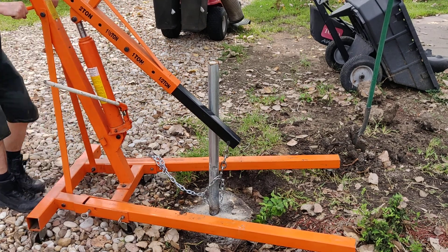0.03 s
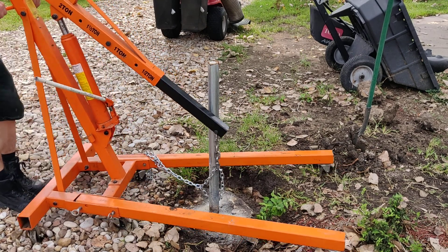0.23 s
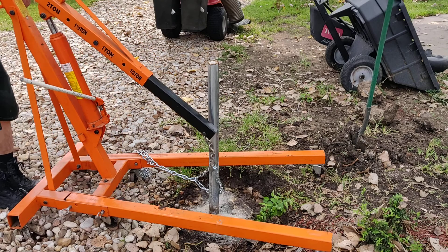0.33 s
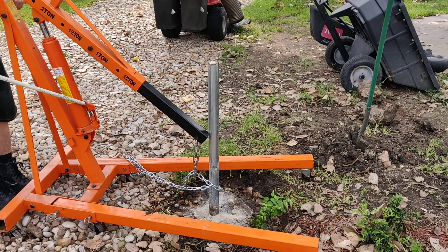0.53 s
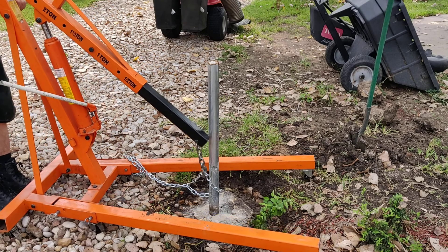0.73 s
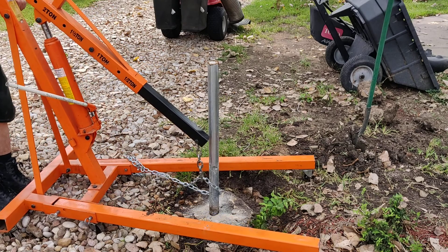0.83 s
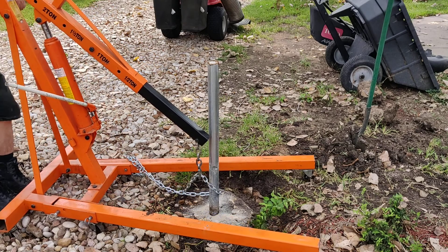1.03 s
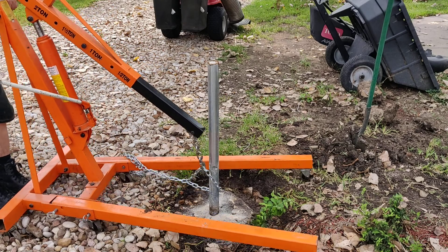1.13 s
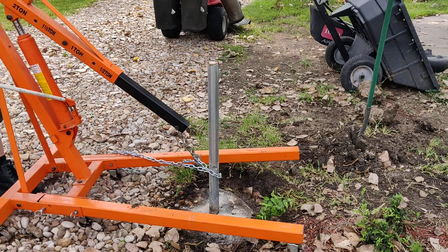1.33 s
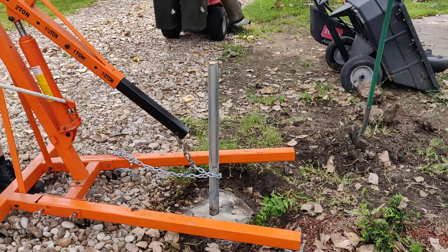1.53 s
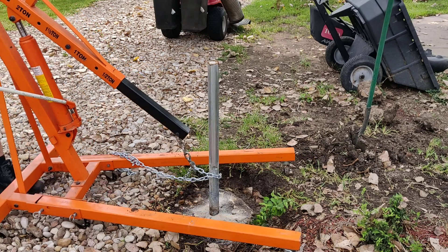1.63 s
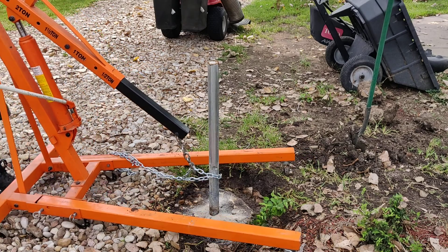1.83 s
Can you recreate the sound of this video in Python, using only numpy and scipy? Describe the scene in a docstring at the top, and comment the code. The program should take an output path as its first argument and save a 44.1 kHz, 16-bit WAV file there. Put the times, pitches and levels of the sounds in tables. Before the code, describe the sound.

Small hoist wheels crunch and jolt over gravel in two pushes, with light chain clinks.

```python
"""Engine hoist on gravel.

A steel hoist is shoved twice over a yard. Its small wheels grind through the stones and jolt over
them, pebbles snap aside and the hollow frame rings. Its chain knocks on a steel post and clinks.
A low outdoor rumble lies below; the two microphone ports colour the treble differently."""
import sys
import numpy as np
from scipy import signal
from scipy.fft import rfft, irfft, next_fast_len
from scipy.io import wavfile
from scipy.ndimage import uniform_filter1d, minimum_filter1d

SR = 44100
rng = np.random.default_rng(int(sys.argv[2]) if len(sys.argv) > 2 else 0)


def bounce(signal):
    """Save signal as a 16-bit WAV file at the path given by the first command-line argument."""
    frames = np.transpose(np.atleast_2d(signal))
    limited = np.clip(frames, -1, 1)
    pcm = np.round(limited * 32767).astype(np.int16)
    wavfile.write(sys.argv[1], SR, pcm)


N = 83790
TIME_S = np.arange(N) / SR

# noise spectra: freq_hz, relative_density_db
RUMBLE_SPECTRUM = [(25, 1.5), (40, -4), (57, -6), (80, -4), (130, -4), (220, -12), (450, -18),
                   (1100, -18.5), (2500, -39), (6000, -33), (15000, -34)]
CRUNCH_SPECTRUM = [(500, -19), (1200, -14.5), (2000, -2.5), (2500, -4), (3050, -5), (3800, 4), (5500, 1.5),
                   (7000, 2.5), (9000, -7), (15000, -10)]
GRIND_SPECTRUM = [(100, -16), (200, -4.5), (300, -6.5), (420, 0), (650, 2.5), (1300, 3), (1900, -3.5),
                  (2800, -1.5), (5000, -21)]
PEBBLE_SPECTRUM = [(1500, -17), (3000, -11.5), (4200, 2.5), (6300, 5), (8500, -6), (15000, -7.5)]
# level curves: time_s, level_db
DRONE_LEVELS = [(0, -38), (.4, -49.5), (.75, -47.5), (.95, -49.5), (1.1, -34.5), (1.25, -53), (1.42, -40.5),
                (1.5, -37), (1.62, -47), (1.9, -38)]
HISS_LEVELS = [(.14, -62), (.2, -38), (.28, -26), (.32, -14.5), (.39, -30), (.46, -18), (.56, -32),
               (.68, -34), (.74, -43), (.78, -31.5), (.88, -56), (1.14, -53), (1.22, -24), (1.37, -34),
               (1.45, -14.5), (1.54, -29), (1.59, -17.5), (1.66, -27), (1.76, -63)]
# wheels in gravel, per shove: time_s, crunch_db, grind_db
SHOVE_1 = [(0, -78, -51.5), (.06, -62, -57.5), (.11, -49, -51.5), (.168, -40.5, -45.5), (.2, -33, -36.5),
           (0.238, -37, -25), (0.258, -16.5, -30.5), (0.291, -20, -28.5), (.33, -16.5, -25.5),
           (0.388, -22, -32.5), (.48, -20, -25), (0.521, -13, -21.5), (0.571, -22.5, -29),
           (0.606, -20.5, -37.5), (0.629, -32.5, -34.5), (.71, -38, -51), (.87, -53.5, -57)]
SHOVE_2 = [(1.03, -62, -52.5), (1.09, -42.5, -49), (1.153, -47, -42), (1.183, -26.5, -18.5),
           (1.227, -21.5, -26), (1.275, -22.5, -33.5), (1.301, -20.5, -30.5), (1.43, -29.5, -34.5),
           (1.482, -22, -32.5), (1.521, -32, -36), (1.585, -34.5, -43.5), (1.616, -35, -39.5),
           (1.7, -48.5, -52.5), (1.75, -58.5, -49.5), (1.809, -44, -49), (1.9, -57, -63)]
# pebbles snapping aside: start_s, level_db
PEBBLE_SNAPS = [(0.07, -27), (0.0896, -24.5), (0.129, -26.5), (0.1792, -19.5), (0.446, -17), (0.459, -17),
                (0.4797, -15), (0.487, -17.5), (0.565, -17), (0.687, -29), (0.7137, -21.5), (0.785, -35),
                (0.8126, -34.5), (1.1345, -23.5), (1.18, -28), (1.2955, -15), (1.346, -10.5), (1.602, -23),
                (1.615, -29)]
# wheel jolts: start_s, crunch_db, thud_db, t60_s
WHEEL_JOLTS = [(0.1765, -24, -34, 0.16), (0.244, -6, -15.5, 0.12), (0.3015, -13, -18.5, 0.24),
               (.327, -8, -31, 0.12), (0.502, -12.5, -39, 0.082), (0.59, -20, -18, 0.029),
               (1.17, -22, -21, 0.13), (1.188, -2, -39, 0.051), (1.2022, -7.5, -48, 0.15)]
# chain contacts: start_s, level_db, tilt_db_per_octave
POST_KNOCKS = [(.9058, -30.5, -1), (1.2055, -25, 11.5)]
LINK_CLINKS = [(.999, -42, -4.5), (1.7625, -36, 2), (1.797, -42.5, 11.5)]
# steel modes: pitch_hz, gain_db, t60_s
FRAME_MODES = [(305.3, -8.5, 0.098), (857, -14, 1), (1212, -12, 0.66), (1665, -5.5, 0.071), (1800, -10, 1),
               (1855, -12.5, 0.11), (3567, -4, 0.18), (3783, -2.5, 0.042), (4480, -7, 0.15),
               (4890, -2, 0.051), (5470, -9.5, 0.033), (5670, -11, 0.072)]
POST_MODES = [(1808, 0, 0.69), (1960, -14, 0.22), (3876, 2, 0.15), (4980, -1, 0.16), (4970, -4.5, 0.38),
              (5728, -17, 0.08), (6190, -15, 0.087), (7500, -25, .14), (8260, 2, 0.1), (8600, -9, 0.15),
              (10020, -12, 0.18)]
LINK_MODES = [(1217, -3.5, .07), (1710, 5, 0.07), (1966, 9.5, 0.031), (2663, 2, 0.093), (3520, 11, 0.027),
              (4032, 6.5, 0.053), (6440, -31, .12), (7100, -35, 0.13)]
# left-right likeness: freq_hz, coherence
STEREO_COHERENCE = [(60, 0.98), (250, 0.97), (600, 0.83), (1200, 0.37), (2500, 0.34), (6000, 0.19),
                    (14000, .35)]
# microphone port responses: freq_hz, gain_db
LEFT_RESPONSE = [(100, -1), (1200, 0.5), (2500, 2.5), (3050, 2), (3600, 0), (4500, 0.5), (5500, 4),
                 (6300, 9.5), (7100, 0.5), (8100, -7.5), (8900, -31), (10300, -36), (12500, -27),
                 (14300, -26.5), (16000, -22)]
RIGHT_RESPONSE = [(100, -1.5), (1200, -2), (2500, 1), (3050, 2.5), (3600, -2.5), (5500, -2), (6300, -3.5),
                  (7300, -3.5), (8400, 1), (9400, -4), (10500, -24), (12800, -23), (14000, -15),
                  (16000, -17.5)]


def from_db(db):
    """Decibels to gain."""
    return 10 ** (np.asarray(db) / 20)


def unit_rms(x):
    """Scale to rms 1."""
    return x / np.sqrt(np.mean(x ** 2) + 1e-20)


def at_hz(points, hz):
    """Interpolate over log frequency."""
    freqs_hz, values = np.transpose(points)
    return np.interp(np.log(np.maximum(hz, 1)), np.log(freqs_hz), values)


def drift(rate_hz):
    """Smooth random wander, rms 1."""
    hop, warmup = 40, 2000
    pole = np.exp(-2 * np.pi * rate_hz * hop / SR)
    white = rng.standard_normal(N // hop + warmup + 2)
    slow = signal.lfilter([1], [1, -2 * pole, pole * pole], white)[warmup:]
    return np.interp(np.arange(N) / hop, np.arange(len(slow)), unit_rms(slow))


def delayed(x, delay_s):
    """Delay by whole samples."""
    return np.r_[np.zeros(round(delay_s * SR)), x][:N]


def clicks(starts_s, levels_db):
    """One impulse per event."""
    out = np.zeros(N)
    samples = np.round(np.array(starts_s) * SR).astype(int)
    np.add.at(out, np.clip(samples, 0, N - 1), from_db(levels_db))
    return out


def decay_power(hits, t60_s):
    """Power envelope decaying from each hit."""
    return signal.lfilter([1], [1, -10 ** (-6 / (t60_s * SR))], hits ** 2 + 1e-18)


def ring(drive, hz, t60_s):
    """One mode: a unit click starts a decaying unit sine."""
    pole = np.exp(-np.log(1000) / (t60_s * SR))
    step_rad = 2 * np.pi * hz / SR
    feedback = [1, -2 * pole * np.cos(step_rad), pole * pole]
    return signal.lfilter([0, np.sin(step_rad)], feedback, drive + 1e-18)


def band_noise(power, spectrum, colour_db=3.5, stones_per_s=97):
    """Stereo noise in third octaves; band gains wander by colour_db, as each stone favours others."""
    edges_hz = 22 * 2 ** (np.arange(30) / 3)
    centres_hz = np.sqrt(edges_hz[1:] * edges_hz[:-1])
    gains = from_db(at_hz(spectrum, centres_hz)) * (centres_hz > spectrum[0][0] / 2)
    gains /= np.sqrt(np.sum(gains ** 2 * np.diff(edges_hz)) * 2 / SR)
    white = rng.standard_normal((2, 2, N)) * np.sqrt(power)
    out = np.zeros((2, N))
    for k in np.flatnonzero(gains):
        band = signal.butter(2, edges_hz[k:k + 2], "band", fs=SR, output="sos")
        wander = unit_rms(from_db(colour_db * drift(stones_per_s)))
        mid, side = signal.sosfilt(band, white[k % 2] * wander)  # adjacent bands independent
        coherence = at_hz(STEREO_COHERENCE, centres_hz[k])
        mid *= np.sqrt((1 + coherence) / 2)
        side *= np.sqrt((1 - coherence) / 2)
        out += gains[k] * np.array([mid + side, mid - side])
    return out


def background(rumble_db=-40, drone_hz=56, waver_rad=0.99):
    """Outdoor rumble; a wavering low drone swells and sinks."""
    drone = np.sqrt(2) * np.sin(2 * np.pi * drone_hz * TIME_S + waver_rad * drift(4.5))
    drone_db = np.interp(TIME_S, *np.transpose(DRONE_LEVELS))
    rumble = band_noise(np.ones(N), RUMBLE_SPECTRUM, colour_db=0)
    return from_db(rumble_db) * rumble + from_db(drone_db) * drone


def stone_cracks(crunch_db, ref_per_s=1700, ref_db=-20, spread_db=0.5):
    """Power of random cracks, mean near 1; denser under a harder shove."""
    rate_per_s = ref_per_s * from_db(0.55 * (crunch_db - ref_db))
    sizes = from_db(-spread_db * np.minimum(rng.exponential(1, N), 4))
    hits = sizes * (rng.random(N) < rate_per_s / SR)
    power = decay_power(hits, t60_s=0.0097)
    power += 0.15 * power.mean()
    return power / uniform_filter1d(power, size=1300)


def gravel():
    """Wheels crush stones: bright crunch, low grinding that shakes the frame, jolts."""
    times_s, crunch_db, grind_db = np.transpose(SHOVE_1 + SHOVE_2)
    crunch_db = np.interp(TIME_S, times_s, crunch_db)
    grind_db = np.interp(TIME_S, times_s, grind_db)
    cracks = stone_cracks(crunch_db)
    crunch_power = cracks * from_db(crunch_db) ** 2
    grind_power = cracks * from_db(grind_db) ** 2
    ringing = frame(grind_power)
    for start_s, jolt_db, thud_db, t60_s in WHEEL_JOLTS:
        crunch_power += jolt(start_s, jolt_db, t60_s) * np.sqrt(cracks)
        grind_power += jolt(start_s, thud_db, t60_s) * np.sqrt(cracks)
    return band_noise(crunch_power, CRUNCH_SPECTRUM) + band_noise(grind_power, GRIND_SPECTRUM) + ringing


def frame(power, gain_db=-5):
    """Stones rattling against the wheels ring the steel frame."""
    out = np.zeros((2, N))
    for hz, mode_db, t60_s in FRAME_MODES:
        coherence = at_hz(STEREO_COHERENCE, hz)
        common = np.sqrt(coherence) * rng.standard_normal(N)
        separate = np.sqrt(1 - coherence) * rng.standard_normal((2, N))
        rattle = np.sqrt(power) * (common + separate)
        out += from_db(mode_db) * unit_rms(ring(rattle, hz, t60_s))
    return out * np.sqrt(power.mean()) * from_db(gain_db)


def pebbles():
    """Single pebbles snap out from under a wheel."""
    power = decay_power(clicks(*np.transpose(PEBBLE_SNAPS)), t60_s=0.018)
    return band_noise(power, PEBBLE_SPECTRUM, colour_db=3)


def top_hiss(band_hz=(13400, 15000), grain_db=1, left_db=-1.5):
    """Thin, grainy hiss above the crunch, slightly right."""
    level_db = np.interp(TIME_S, *np.transpose(HISS_LEVELS)) + grain_db * drift(60)
    band = signal.butter(5, band_hz, "band", fs=SR, output="sos")
    hiss = unit_rms(signal.sosfilt(band, rng.standard_normal((2, N))))
    return hiss * from_db(level_db) * from_db([[left_db], [0]])


def jolt(start_s, level_db, t60_s, attack_s=0.00075):
    """Power of a wheel dropping off a stone: those below give way, then settle."""
    attack = 1 - np.exp(-np.maximum(TIME_S - start_s, 0) / attack_s)
    return attack * decay_power(clicks([start_s], level_db), t60_s)


def chain_strikes(contacts, modes, rattle_db, rattle_t60_s):
    """Steel on steel: a short rattle and ringing modes, each contact with its own brightness."""
    starts_s, levels_db, tilts_db_per_octave = np.transpose(contacts)
    rattle_power = decay_power(clicks(starts_s, levels_db + rattle_db), rattle_t60_s)
    out = band_noise(rattle_power, CRUNCH_SPECTRUM)
    for hz, mode_db, t60_s in modes:
        tilt_db = tilts_db_per_octave * np.log2(hz / 4000)
        tone = ring(clicks(starts_s, levels_db + mode_db + tilt_db), hz, t60_s)
        lag_cycles = rng.uniform(0, 0.067)
        out += np.array([tone, delayed(tone, lag_cycles / hz)])
    return out


def yard_scatter(x, gain_db=-6.5, t60_s=0.068, gap_s=0.004):
    """Faint reflections off the ground and nearby objects."""
    age_s = TIME_S[:SR // 2]
    envelope = np.exp(-np.log(1000) * age_s / t60_s) * (age_s > gap_s)
    tail = rng.standard_normal((2, len(age_s))) * envelope
    tail /= np.sqrt(np.sum(tail ** 2) / 2)
    return from_db(gain_db) * signal.fftconvolve(x, tail, axes=1)[:, :N]


def mic_port(x, response):
    """Minimum-phase colour of one microphone port."""
    size = 2 * next_fast_len(N)
    gains = from_db(at_hz(response, np.fft.rfftfreq(size, 1 / SR)))
    cepstrum = irfft(np.log(gains))
    causal_fold = np.r_[1, np.full(size // 2 - 1, 2), 1, np.zeros(size // 2 - 1)]
    return irfft(rfft(x, size) * np.exp(rfft(cepstrum * causal_fold)))[:N]


def limiter(x, ceiling_db=-2, hold_s=0.003):
    """Gain ducks briefly around peaks."""
    size, ceiling = int(hold_s * SR), from_db(ceiling_db)
    gain = ceiling / np.maximum(np.abs(x), ceiling)
    return x * uniform_filter1d(minimum_filter1d(gain, size), size)


def scene():
    """Hoist and chain slightly left, in open air."""
    knocks = chain_strikes(POST_KNOCKS, POST_MODES, rattle_db=1.5, rattle_t60_s=0.22)
    clinks = chain_strikes(LINK_CLINKS, LINK_MODES, rattle_db=0.5, rattle_t60_s=0.071)
    left, right = gravel() + pebbles() + top_hiss() + knocks + clinks
    hoist = np.array([left, delayed(right, delay_s=0.00015)])
    return hoist + yard_scatter(hoist) + background()


def record(dry):
    """Port colour, limiter, steep low-pass."""
    cutoff_hz = 15750
    coloured = np.array([mic_port(dry[0], LEFT_RESPONSE), mic_port(dry[1], RIGHT_RESPONSE)])
    lowpass = signal.ellip(12, 0.1, 90, cutoff_hz, fs=SR, output="sos")
    return signal.sosfilt(lowpass, limiter(coloured))


dry = scene()
out = record(dry)
bounce(out)
```